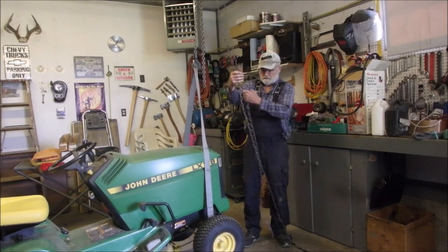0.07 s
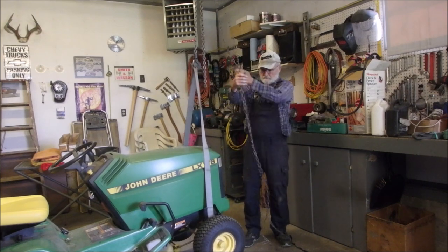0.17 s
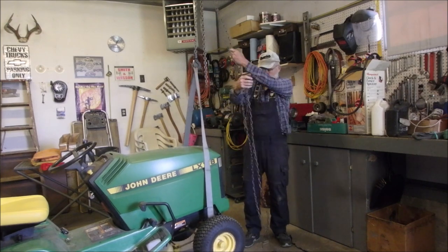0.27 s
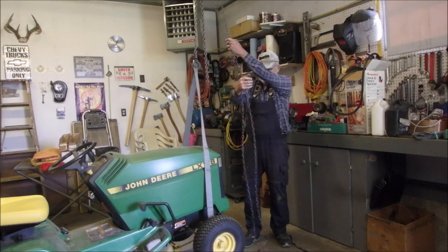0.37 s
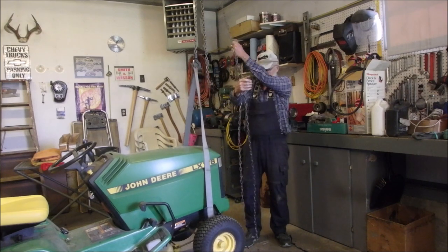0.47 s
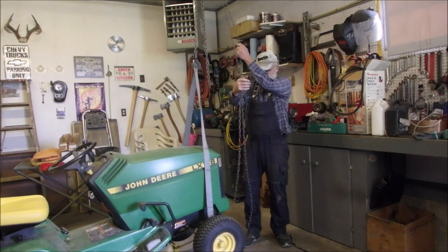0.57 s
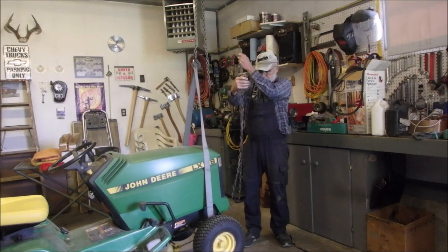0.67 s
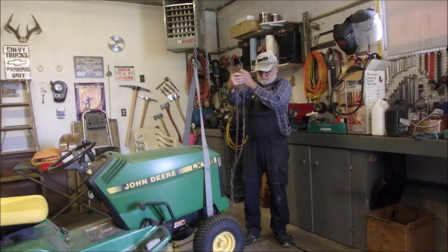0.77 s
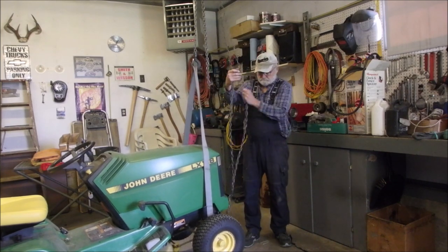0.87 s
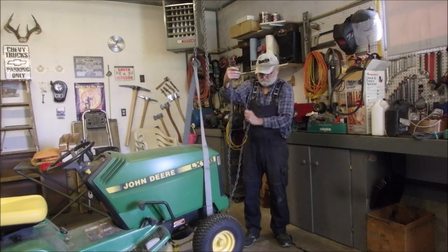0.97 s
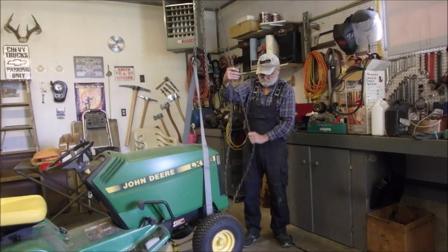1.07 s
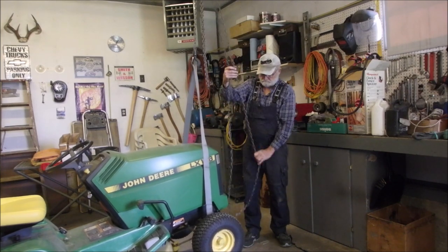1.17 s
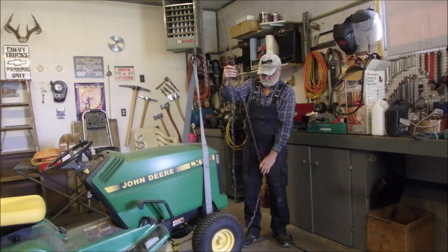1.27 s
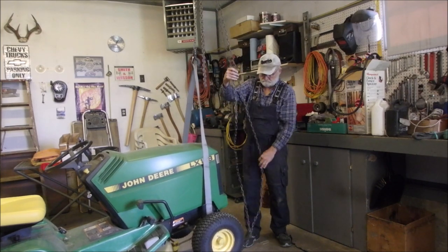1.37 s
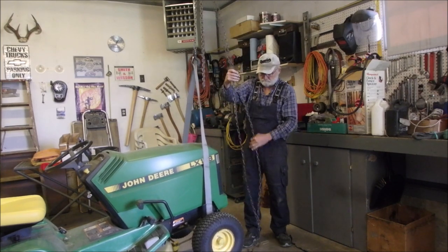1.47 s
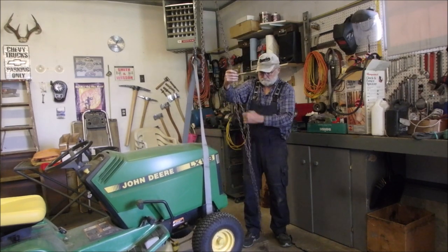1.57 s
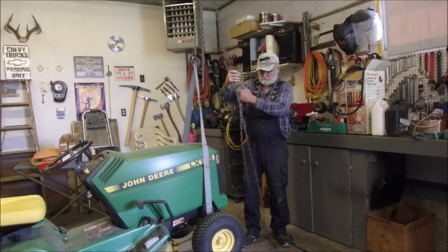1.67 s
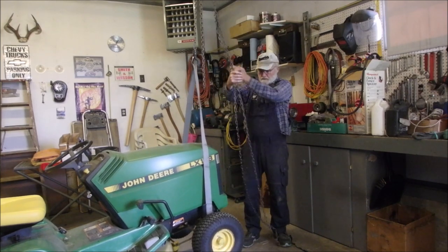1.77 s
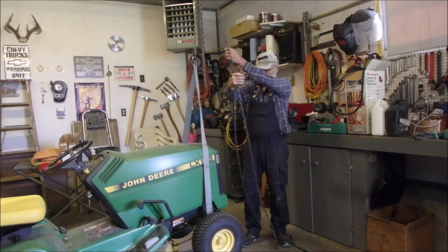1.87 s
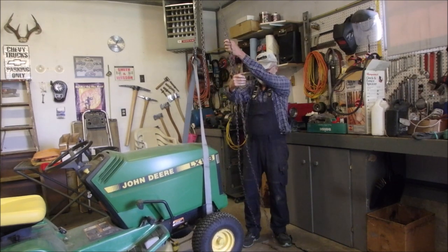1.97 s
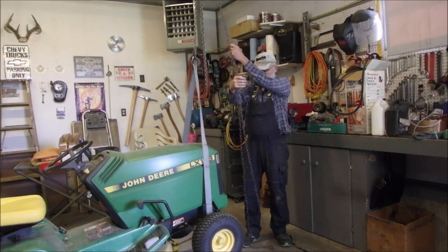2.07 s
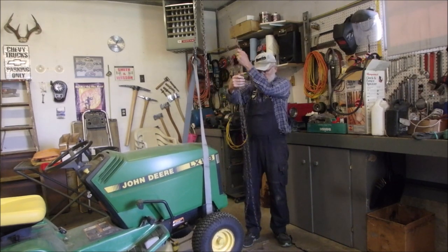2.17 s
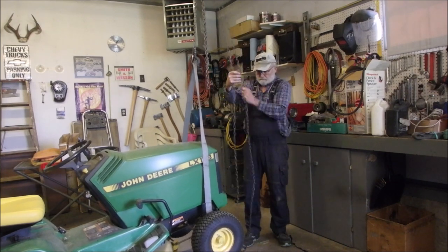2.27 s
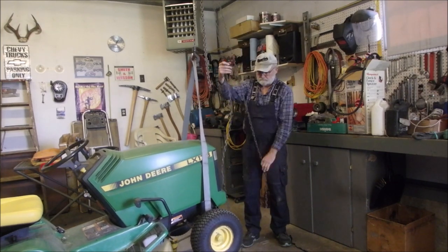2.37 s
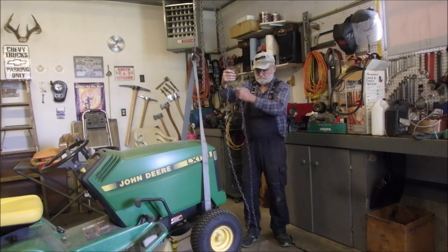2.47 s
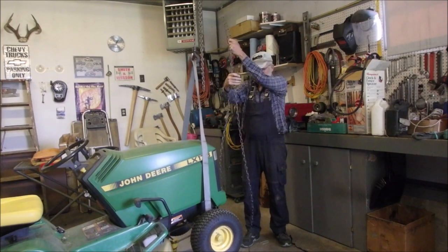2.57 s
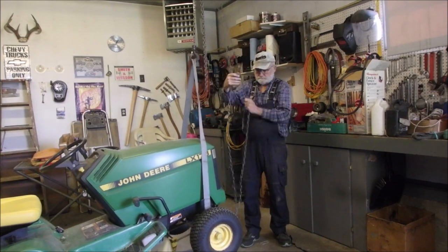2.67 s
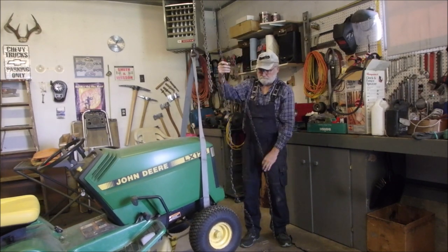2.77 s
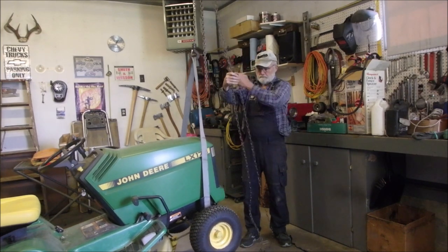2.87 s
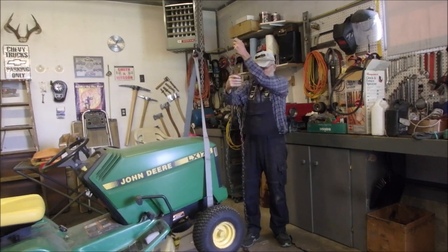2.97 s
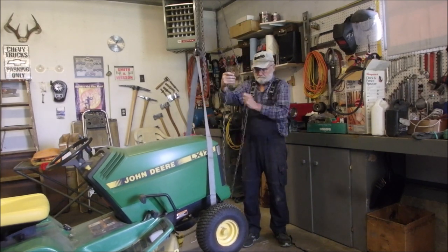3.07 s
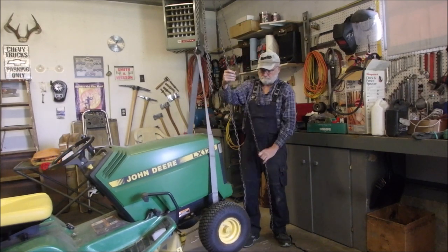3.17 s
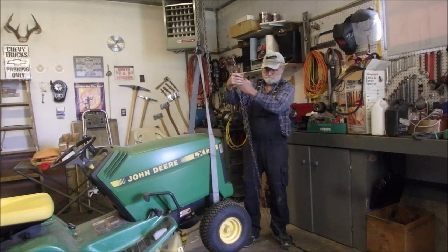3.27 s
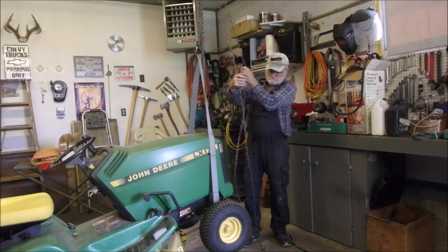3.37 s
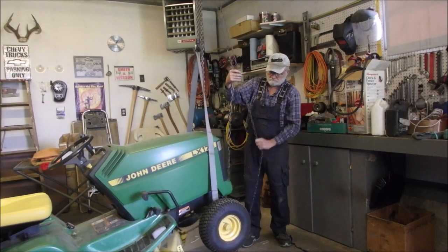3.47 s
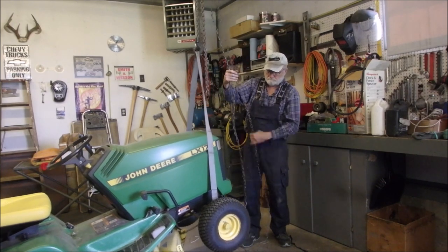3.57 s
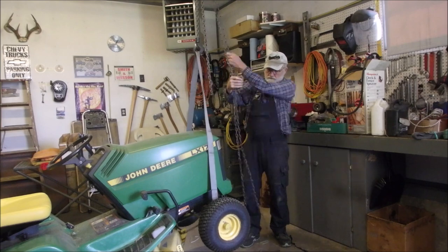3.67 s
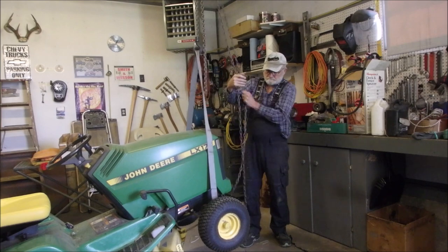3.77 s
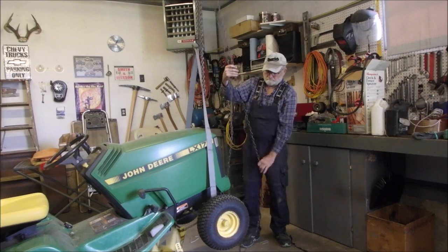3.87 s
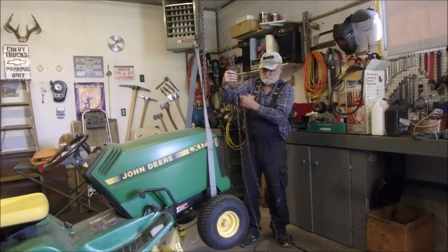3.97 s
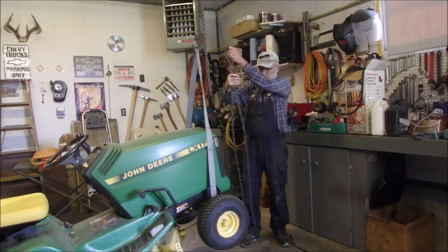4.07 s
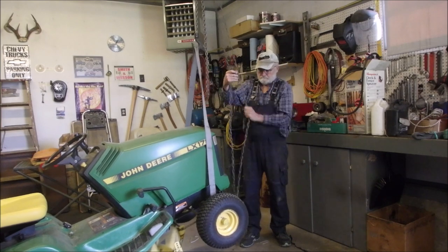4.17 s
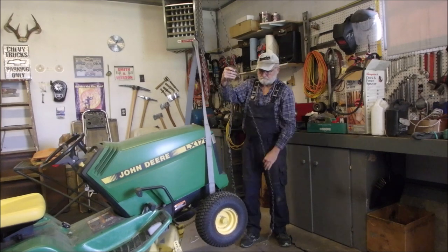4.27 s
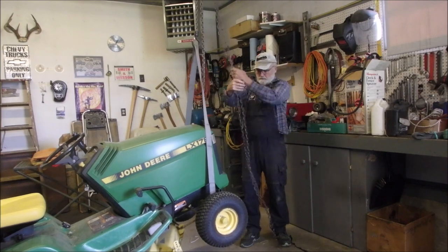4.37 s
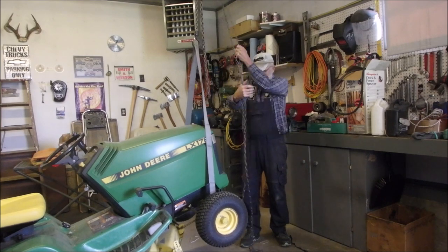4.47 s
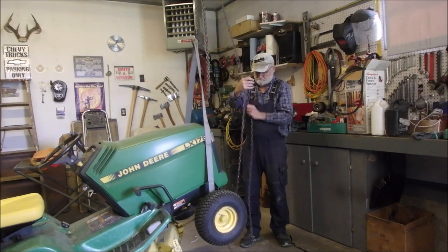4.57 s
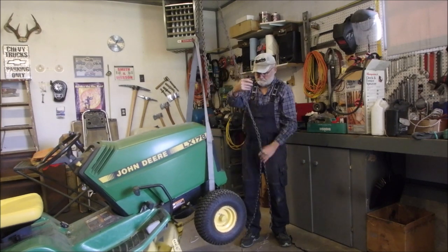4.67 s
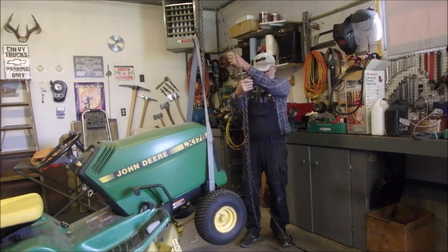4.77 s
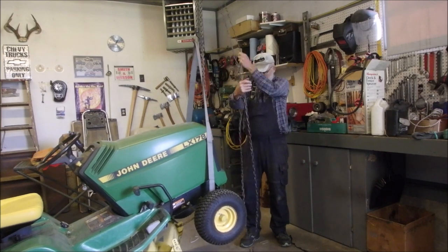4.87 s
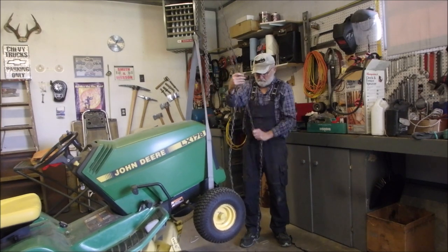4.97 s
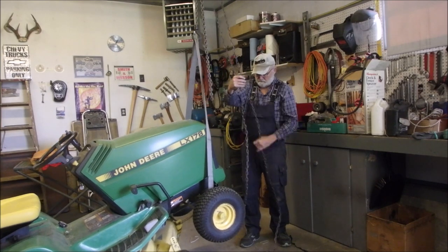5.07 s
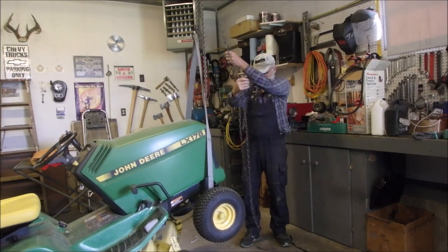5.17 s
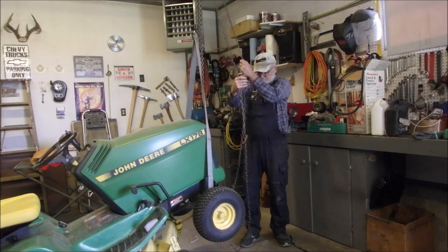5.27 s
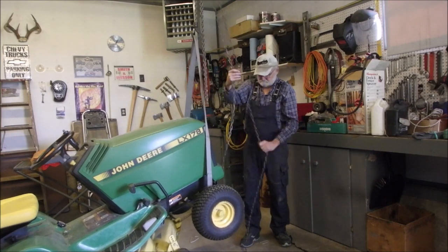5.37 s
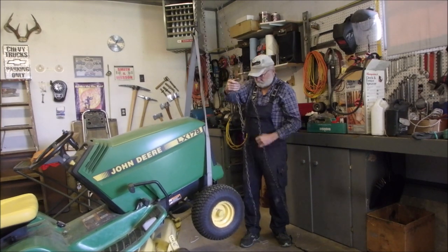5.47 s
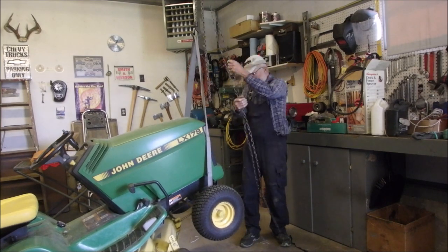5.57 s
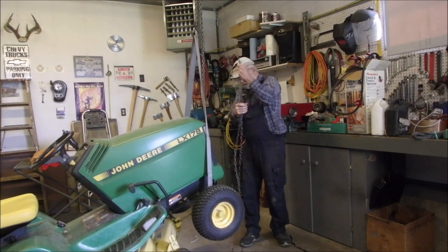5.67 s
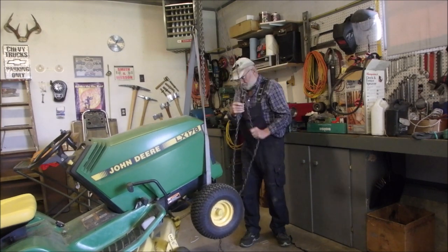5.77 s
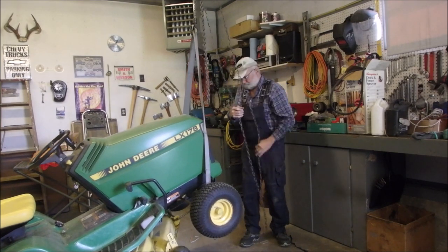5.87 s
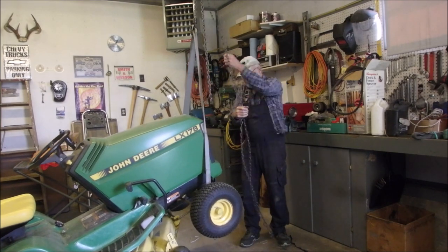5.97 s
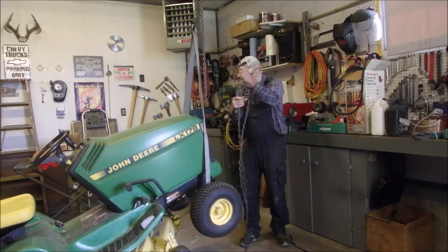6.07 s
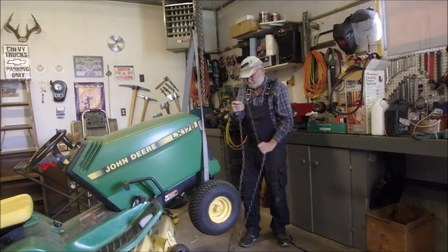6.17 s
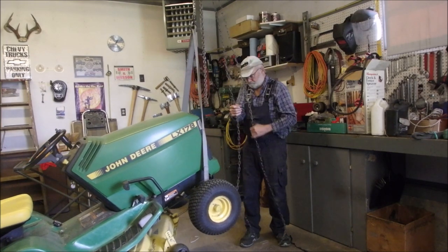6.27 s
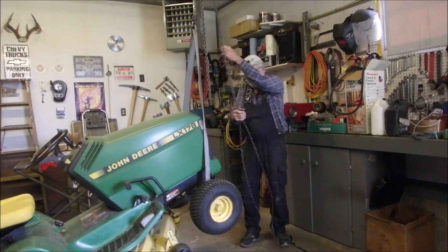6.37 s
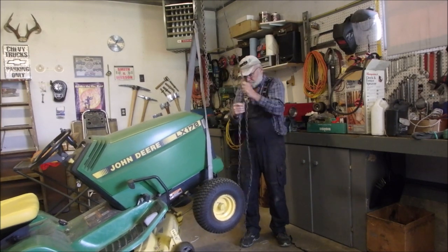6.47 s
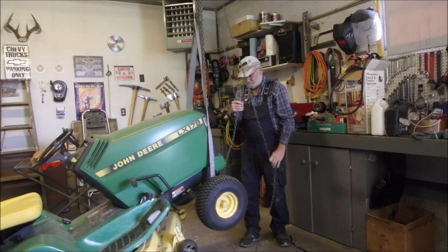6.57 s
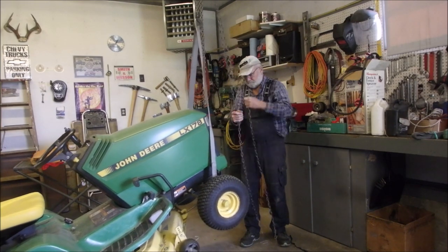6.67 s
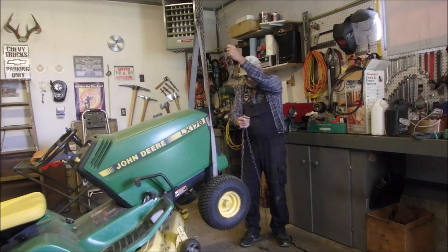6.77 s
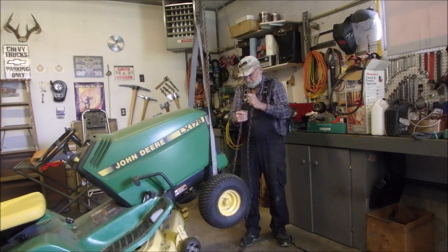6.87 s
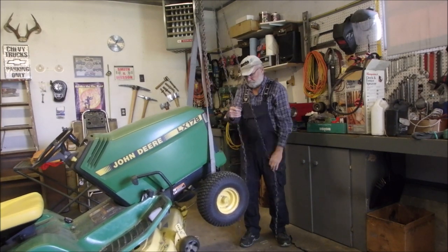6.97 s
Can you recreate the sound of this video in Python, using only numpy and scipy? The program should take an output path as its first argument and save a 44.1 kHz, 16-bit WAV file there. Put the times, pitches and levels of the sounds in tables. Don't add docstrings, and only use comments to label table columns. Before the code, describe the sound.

In a reverberant home garage, the ring of a steel hoist cover fades, loose chain tinkles, then hand-pulled links clatter over the wheel with heavy knocks. After a short quiet gap a knock starts another pull, and the sound suddenly runs four times faster: brief, bright, higher-pitched rattling bursts about every 0.4 seconds to the end. Close stereo microphone, faint room air.

```python
import sys
import numpy as np
from scipy import signal
from scipy.fft import rfft, irfft
from scipy.io import wavfile
from scipy.ndimage import uniform_filter1d, map_coordinates

SR = 44100
rng = np.random.default_rng(int(sys.argv[2]) if len(sys.argv) > 2 else 0)


def transcribe(u):
    v = np.clip(np.atleast_2d(u).T, -1, 1)
    q = np.round(v * 32767).astype(np.int16)
    wavfile.write(sys.argv[1], SR, q)


def attenuation_scalar(level_db):
    decades = np.asarray(level_db, float) / 20
    return 10 ** decades


N = 309613

SPEED_UP_S, FAST = 2.322, 4
LEAD = SR // 2
TIME = (np.arange(N + LEAD) - LEAD) / SR

# pitch_hz, level_db
AIR_SPECTRUM = [(30, -49), (70, -24), (130, -6.5), (250, -7), (1000, -7), (2500, -8), (4000, -6.5),
                (6000, -19), (10000, -23), (15500, -29)]
# pitch_hz, t60_s
GARAGE_T60 = [(150, 1.61), (500, 0.98), (1500, 0.97), (4000, 0.88), (8000, 0.66), (14000, 0.45)]
# pitch_hz, side_over_mid_db
SIDE_WIDTH = [(60, -25), (200, -32), (700, -31), (1150, -22.5), (1350, -21), (2100, -23), (2350, -18.5),
              (4400, -9), (8120, -6.5), (15000, 2.5)]
# pitch_hz, width_hz, level_db
MIC_NOTCHES = [(2205, 95, -32), (3105, 55, -26), (4100, 50, -20), (5150, 60, -14), (5600, 40, -8),
               (6140, 60, -18)]

# peak_s, peak_db, rise_s, fall_s
CHAIN_SWINGS = [
    (.45, -54, .105, .19),
    (1.685, -49, .045, .05),
    (1.86, -66, .08, .07),
    (2.03, -63, .1, .3),
]
# pitch_hz, level_db
TINKLE_SPECTRUM = [(1500, -33), (4500, -10), (6000, 9), (8500, 8), (12000, -1), (15500, -10)]
SWING_RISE_DB, SWING_FALL_DB = 9, 11

# pitch_hz, width_hz, level_db
COVER_MODES = [(208.9, 22.4, -17.5), (312.3, 33, -14.5), (544.4, 30, -14), (825, 47, -4), (859.4, 70, -5),
               (880.4, 18, -6.5), (997, 135, -5.5), (1114, 140, -12.5), (1200, 34, -9), (1551, 170, -8.5),
               (1651, 180, -7), (1800, 38, -13.5)]
# pitch_hz, width_hz, level_db
PAWL_MODES = [(314, 51, -25), (841, 74, -4), (904, 62, -1.5), (1010, 76, -6.5), (1555, 200, -10),
              (2370, 77, -3.5)]
# pitch_hz, width_hz, level_db
WHEEL_MODES = [(2322, 110, -1), (2564, 24, 1), (2820, 150, -3), (3123, 80, 2), (3326, 300, -10),
               (3660, 81, -39.5), (3700, 120, -7), (4264, 170, -6)]
# pitch_hz, width_hz, level_db
LINK_MODES = [(5950, 190, -7), (6490, 400, 1), (7500, 120, -11), (8200, 310, -7), (8800, 120, -5),
              (10000, 140, -9)]
# pitch_hz, level_db
COVER_THUD_SPECTRUM = [(20, -90), (50, -73.5), (130, -29), (450, -22), (750, -14), (1300, -14.5),
                       (2000, -13.5), (3000, -38), (6000, -56)]
# pitch_hz, level_db
WHEEL_CRACK = [(500, -62), (1500, -28), (2300, 0), (3800, -8), (4800, -2.5), (5600, -13.5), (9000, -74)]
# pitch_hz, level_db
LINK_TIP_CRACK = [(2000, -47.5), (4500, -27.5), (5600, -16.5), (7000, -5), (10000, -12), (15000, -22.5)]
# pitch_hz, t60_s, level_db
BELL_MODES = [(897, .2, -15), (1515, .15, -18), (1715, .2, -18), (2361, .45, -7), (2410, .3, -15),
              (2532, .3, -13), (2566, .3, -14), (3350, .3, -15), (3423, .4, -11), (4245, .3, -13),
              (6546, .2, -16)]

# start_s, length_s, clatter_start_db, clatter_end_db, jerk_db
PULLS = [(-.62, .46, -27, -29, -15), (.67, .11, -28, -24, -13), (.83, .48, -24.5, -25.5, -24),
         (2.251, .2, -27, -26.5, -14), (2.6773, .166, -29, -28.5, -6.5), (3.0644, .174, -29, -23.5, -24),
         (3.4421, .165, -26.5, -27, -10.5), (3.8137, .15, -23, -28, -10), (4.1914, .12, -25, -22, -5),
         (4.554, .172, -26.5, -25.5, -10.5), (4.9382, .175, -26, -27.5, -7), (5.3293, .158, -26, -25, -6),
         (5.7384, .17, -28.5, -24, -11), (6.1394, .135, -23, -26, -7.5), (6.5131, .157, -22, -27, -8),
         (6.8967, .16, -24.5, -24, -6)]
ARCH_DB, RISE_DB, RISE_S = 2.1, 6, .05
RING_DB, FRESH_RING_DB, FRESH_S = -6, 4.5, .3
RATTLE_DB, RATTLE_FOLLOWS = -26, .15

# start_s, peak_db, cover_over_peak_db, creeping_clatter_db (to the next step)
HAND_GRIPS = [(.352, -48, -9, -53), (.476, -20.5, -9, -55), (.645, -13.5, -17, -41),
              (1.957, -39.5, -2.5, -60), (2.021, -31, .5, -62), (2.189, -44, 8, -52),
              (2.237, -31, -12, -38), (2.268, -5, -11, -60), (2.6224, -25, .5, -48),
              (3.0111, -14, -12, -43), (3.3892, -34, 2, -60), (3.4176, -22, -4.5, -41),
              (3.7828, -13.5, -6, -33), (4.125, -46, 0, -54), (4.1505, -17, -6, -36),
              (4.5077, -17, -7, -48), (4.8848, -50, 17, -62), (4.9267, -30, 0, -40),
              (5.2839, -22, -4.5, -42), (5.6835, -28, -11, -50), (6.0821, -36, -4, -50),
              (6.103, -16.5, -4, -31), (6.4423, -33, -8, -58), (6.4632, -18, -10, -35),
              (6.8628, -15.5, -8, -32)]
CREEP_SAG_DB_PER_S, CREEP_RING_DB, GRIP_TIP_DB = 30, -1, -20
# start_s, peak_db
SEATING_JERKS = [(.714, -15), (.749, -11), (.764, -12), (.777, -14), (2.238, -31), (2.668, -31),
                 (2.692, -7), (2.705, -4), (2.716, -8), (3.165, -9), (3.461, -9.5), (4.2064, -9),
                 (4.29, -9), (4.305, -6), (5.3094, -32), (5.3657, -6), (5.7643, -12), (5.7788, -9),
                 (6.1135, -20), (6.1544, -10)]
JERK_RING_DB, JERK_TIP_DB = -10.5, -1.5
# start_s, peak_db
PAWL_SETTLES = [(-.09, -21), (2.5344, -30), (2.965, -41), (3.2994, -31), (3.6421, -19), (4.445, -41),
                (4.7744, -31), (5.1444, -31), (5.5394, -21.5), (5.9494, -37), (6.34, -26), (6.7044, -26),
                (6.7161, -20.5)]
SETTLE_RING_DB = .1


def clock(speed):
    change = round(SPEED_UP_S * SR)
    return TIME[:LEAD + change] if speed == 1 else TIME[change:]


def true_hz(speed):
    return np.fft.rfftfreq(2 ** 14, speed / SR)


def along(points, hz):
    f, v = np.transpose(points)
    return np.interp(np.log(hz + 1), np.log(f + 1), v)


def unit(x):
    return x / np.sqrt(np.mean(x ** 2) + 1e-30)


def causal(gain):
    cepstrum = irfft(np.log(gain + 1e-6))
    half = len(cepstrum) // 2
    cepstrum[1:half] *= 2
    cepstrum[half + 1:] = 0
    return irfft(np.exp(rfft(cepstrum)))


def through(x, response):
    return signal.oaconvolve(x, response)[:len(x)]


def fading(x, seconds, speed):
    return signal.lfilter([1], [1, -np.exp(-speed / seconds / SR)], x)


def contacts(per_second, spread_db, touch, speed):
    n = len(clock(speed))
    chance, size = rng.random(n), rng.exponential(size=n)
    hits = (chance < per_second * speed / SR) * attenuation_scalar(spread_db * np.minimum(size, 3.3))
    return unit(fading(hits, touch, speed))


def gated(tables, coast_db, speed):
    time = clock(speed)
    gain = np.zeros(len(time))
    for rows in tables:
        s, db = np.transpose(rows)
        a, b = np.searchsorted(time, [s[0], s[-1] + 70 / coast_db / speed])
        coasting = np.maximum(time[a:b] - s[-1], 0)
        gain[a:b] += attenuation_scalar(np.interp(time[a:b], s, db) - coast_db * speed * coasting)
    return gain


def still_air(speed, level_db):
    colour = causal(attenuation_scalar(along(AIR_SPECTRUM, true_hz(speed))))
    air = [through(noise, colour) for noise in rng.standard_normal((2, len(clock(speed))))]
    return attenuation_scalar(level_db) * np.array(air) / np.std(air[0])


def garage(x, speed, direct_db, count=4):
    rate = SR / speed
    noise = rng.standard_normal((count, 2, int(1.6 * SR / speed)))
    hz, t, z = signal.stft(noise, rate, nperseg=128)
    decay = attenuation_scalar(-60 * t / along(GARAGE_T60, hz)[:, None])
    tails = signal.istft(z * decay, rate, nperseg=128)[1]
    tails = tails / np.linalg.norm(tails, axis=-1, keepdims=True)
    path = np.floor(clock(speed) * speed / .09) % count
    late = np.roll(x, int(.005 * SR / speed))
    mid, side = (sum(through(late * (path == k), tails[k, c]) for k in range(count)) for c in (0, 1))
    share = np.clip(attenuation_scalar(direct_db), 0, .99)
    return np.array([share * x + np.sqrt(1 - share ** 2) * mid, side])


def loose_chain(speed):
    touches = contacts(500, spread_db=1.5, touch=.0022, speed=speed)
    touches = touches * rng.standard_normal(len(touches))
    swings = [[(s - rise, db - SWING_RISE_DB), (s, db), (s + fall, db - SWING_FALL_DB)]
              for s, db, rise, fall in CHAIN_SWINGS]
    colour = causal(attenuation_scalar(along(TINKLE_SPECTRUM, true_hz(speed))))
    return attenuation_scalar(6.5) * through(gated(swings, coast_db=203, speed=speed) * touches, colour)


def knocks():
    jerks = SEATING_JERKS + [(row[0], row[-1]) for row in PULLS if row[0] > 0]
    return ([(s, db, db + ring_db, db + GRIP_TIP_DB) for s, db, ring_db, _ in HAND_GRIPS]
            + [(s, db, db + JERK_RING_DB, db + JERK_TIP_DB) for s, db in jerks]
            + [(s, db, db + SETTLE_RING_DB, db + GRIP_TIP_DB) for s, db in PAWL_SETTLES])


def pockets(per_second, speed):
    elapsed = np.arange(len(clock(speed))) / SR * speed
    drift = map_coordinates(rng.standard_normal(400), [elapsed * 12])
    pace = per_second * speed / SR * np.clip(1 + .3 * drift, .2, 2)
    turns = np.floor(np.cumsum(pace))
    drops = np.diff(turns, prepend=0) * attenuation_scalar(2.9 * rng.standard_normal(len(turns)))
    return unit(fading(drops, .0059, speed))


def hauling(speed):
    steps = np.sort([row[0] for row in HAND_GRIPS + PULLS])
    creeps = []
    for s, _, _, db in HAND_GRIPS:
        end = steps[np.searchsorted(steps, s, "right")]
        creeps.append([(s, db), (end, db - CREEP_SAG_DB_PER_S * (end - s) * speed)])
    creep = gated(creeps, coast_db=300, speed=speed)
    u = np.linspace(0, 1, num=40)
    wheel, cover, links = [], [], []
    for s, length, start_db, end_db, _ in PULLS:
        since = u * length * speed
        db = start_db + (end_db - start_db) * u + ARCH_DB * np.sin(np.pi * u)
        db = db - RISE_DB * np.exp(-since / RISE_S)
        wheel.append(np.c_[s + u * length, db])
        cover.append(np.c_[s + u * length, db + RING_DB + FRESH_RING_DB * np.exp(-since / FRESH_S)])
        links.append(np.c_[s + u * length, RATTLE_DB + RATTLE_FOLLOWS * (db - RATTLE_DB)])
    return (creep + gated(wheel, coast_db=116, speed=speed),
            attenuation_scalar(CREEP_RING_DB) * creep + gated(cover, coast_db=165, speed=speed),
            gated(links, coast_db=140, speed=speed))


def bells(force, blows, speed, flare_db):
    out = np.zeros(len(force))
    elapsed = np.arange(len(force)) / SR * speed
    for hz, t60, db in BELL_MODES:
        luck = map_coordinates(rng.standard_normal(200), [elapsed * 6])
        r, turn = attenuation_scalar(-60 * speed / t60 / SR), 2 * np.pi * hz * speed / SR
        drive = (force * attenuation_scalar(flare_db * luck) + blows) * attenuation_scalar(db) * rng.standard_normal(len(force))
        drive = drive * (turn < 3)
        out += signal.lfilter([2 * np.sin(turn) * np.sqrt(1 - r)], [1, -2 * r * np.cos(turn), r * r], drive)
    return out


def steel(modes, broad, speed, crack_db, lo=500, hi=3900):
    hz = true_hz(speed)
    power = attenuation_scalar(along(broad, hz) + crack_db) ** 2
    for centre, width, db in modes:
        power = power + attenuation_scalar(db) ** 2 / (1 + (2 * (hz - centre) / width) ** 2) ** 2
    return causal(np.sqrt(power * len(hz) / np.sum(power[(hz > lo) & (hz < hi)])))


def hoist(speed):
    wheel, cover, links = hauling(speed)
    seating = .51 * pockets(19, speed)
    seating = seating + .7 * contacts(110, spread_db=3.0, touch=.002, speed=speed)
    seating = unit(seating + .59 * contacts(1100, spread_db=1.5, touch=.0018, speed=speed))
    clatter = wheel * seating
    steady = [clatter * attenuation_scalar(-2.5), cover * attenuation_scalar(-1.07) * seating, links * seating]

    struck = np.zeros((3, len(wheel)))
    for s, db, ring_db, tip_db in knocks():
        at = round((s - clock(speed)[0]) * SR)
        if 0 <= at < len(wheel):
            struck[:, at] = attenuation_scalar([db - 5.5, ring_db + 1.0, tip_db + 1.5])
    blows = 1.054 * (fading(struck, .0061, speed) - fading(struck, .0021, speed))
    blows += attenuation_scalar(-27) * fading(struck, .038, speed) * seating

    wheel_part = (WHEEL_MODES, WHEEL_CRACK, 500, 3900)
    cover_part = (COVER_MODES, COVER_THUD_SPECTRUM, 500, 3900)
    pawl_part = (PAWL_MODES, COVER_THUD_SPECTRUM, 500, 3900)
    link_part = (LINK_MODES, LINK_TIP_CRACK, 5000, 14000)
    hauled = [wheel_part, cover_part, link_part]
    knocked = [wheel_part, pawl_part, link_part]
    sound = bells(.66 * clatter, .27 * blows[1], speed, flare_db=4)
    for forces, parts, crack_db in ((steady, hauled, .1), (blows, knocked, -8)):
        for force, (modes, broad, lo, hi) in zip(forces, parts):
            noise = force * rng.standard_normal(len(force))
            sound += through(noise, steel(modes, broad, speed, crack_db, lo, hi))
    tap = struck[1] * np.sqrt(.0013 * SR / speed)
    return sound + through(tap, steel(PAWL_MODES, COVER_THUD_SPECTRUM, speed, -4))


def workshop(speed, still_db):
    hz = true_hz(speed)
    still = still_air(speed, still_db)
    mid, side = garage(hoist(speed) + loose_chain(speed), speed, direct_db=-4.5) + still
    passed = np.prod([1 - (1 - attenuation_scalar(db)) / (1 + ((hz - c) / w) ** 2) for c, w, db in MIC_NOTCHES], axis=0)
    passed *= hz ** 4 / (hz ** 4 + 88 ** 4) / (1 + (hz / 15050) ** 300)
    mid = through(mid, causal(passed))
    side = through(side, causal(passed * attenuation_scalar(along(SIDE_WIDTH, hz))))
    return (np.array([mid + side, mid - side]) * attenuation_scalar([[-.5], [.5]]))[:, LEAD:]


def scene():
    return np.hstack([workshop(1, still_db=-55), workshop(FAST, still_db=-55.5)])


def top_cut(x):
    return signal.sosfilt(signal.butter(12, 17000, fs=SR, output="sos"), x)


def record(dry):
    power = np.abs(uniform_filter1d(dry ** 2, 900))
    surge = np.maximum(power - .6 * np.roll(power, 3000, axis=1), 0)
    noise = rng.standard_normal(dry.shape) + .81 * rng.standard_normal(N)
    rumble = signal.lfilter(*signal.butter(2, 220, fs=SR), noise)
    rumble = rumble * (surge ** 1.44 * attenuation_scalar(7.5) + attenuation_scalar(-85))
    band = signal.ellip(10, .1, 60, 15750, fs=SR, output="sos")
    kept = signal.sosfilt(band, dry + rumble)
    return top_cut(kept)


dry = scene()
out = record(dry)
transcribe(out)
```